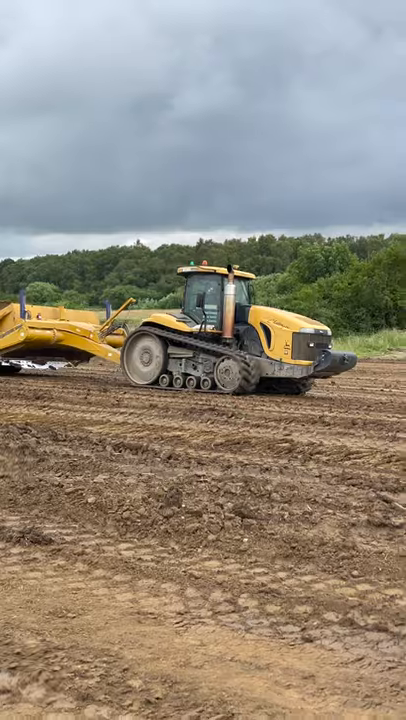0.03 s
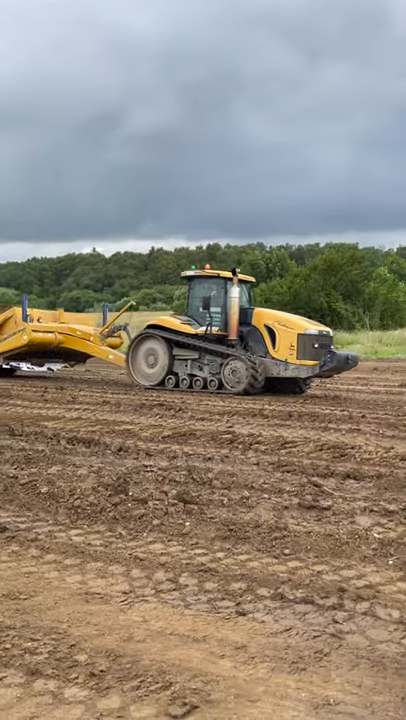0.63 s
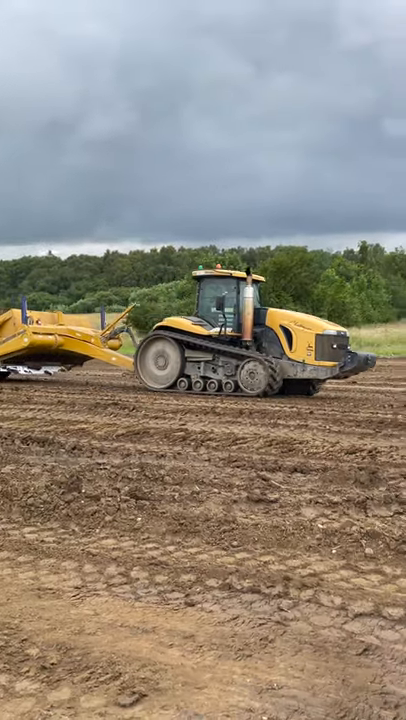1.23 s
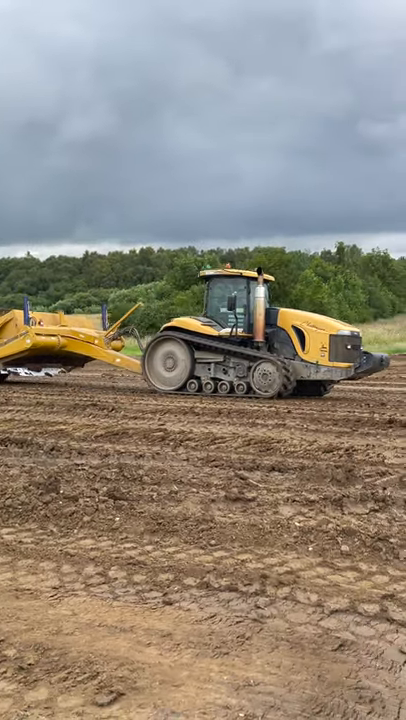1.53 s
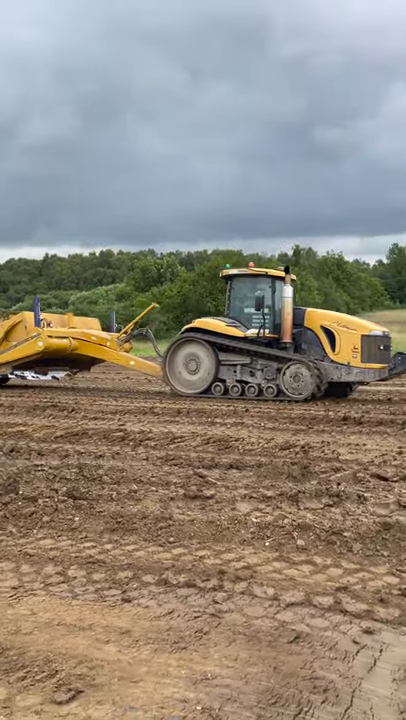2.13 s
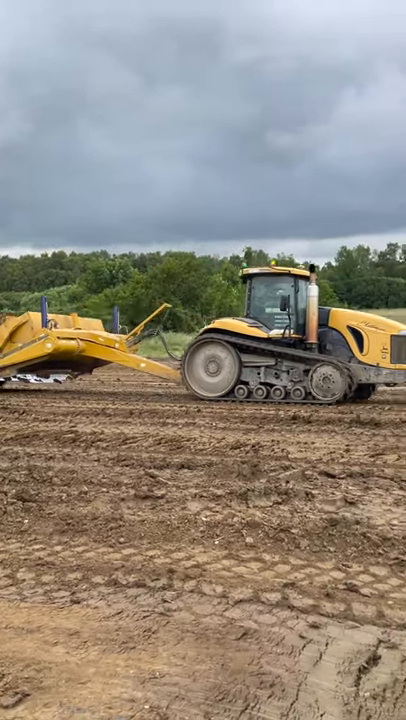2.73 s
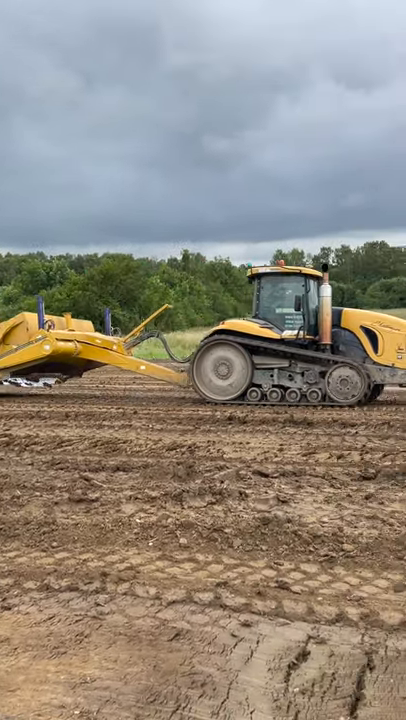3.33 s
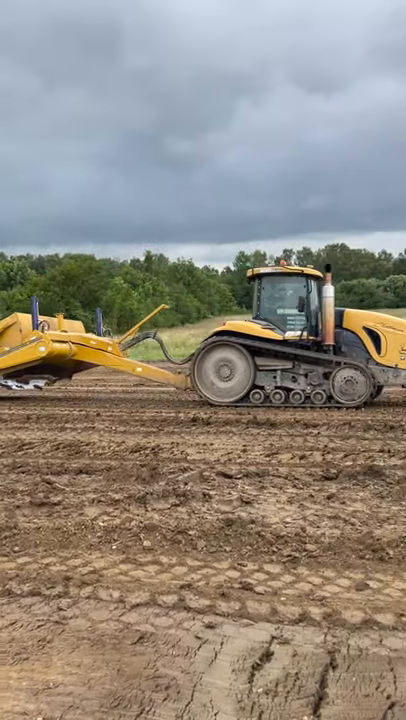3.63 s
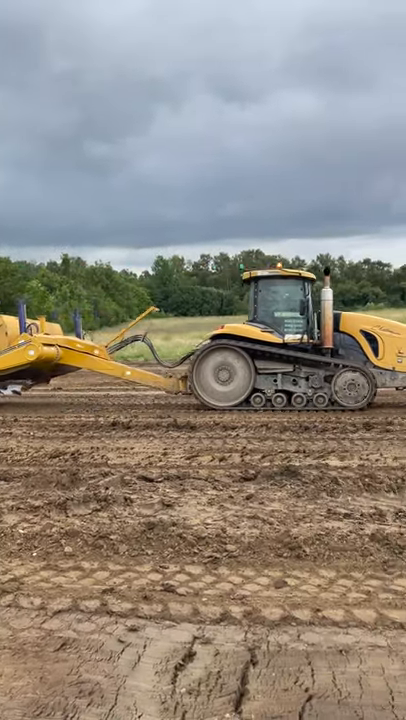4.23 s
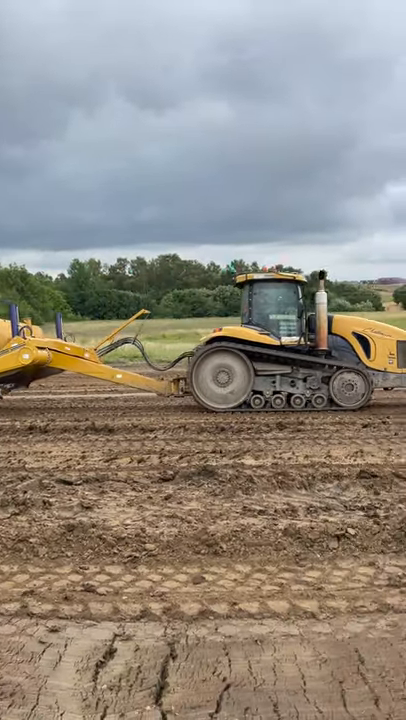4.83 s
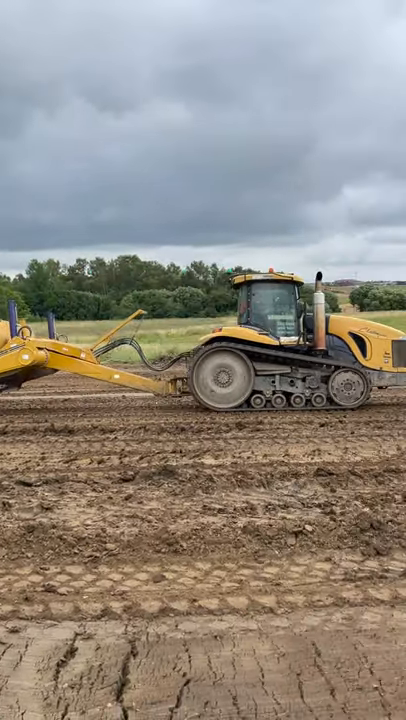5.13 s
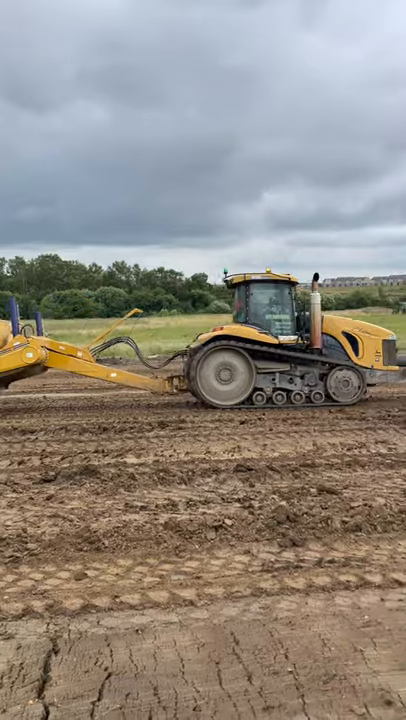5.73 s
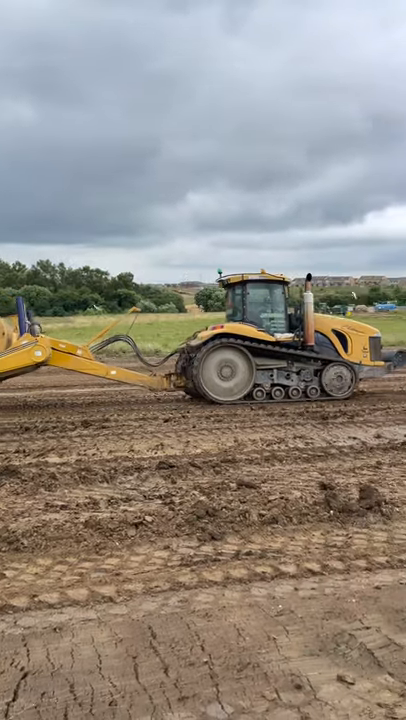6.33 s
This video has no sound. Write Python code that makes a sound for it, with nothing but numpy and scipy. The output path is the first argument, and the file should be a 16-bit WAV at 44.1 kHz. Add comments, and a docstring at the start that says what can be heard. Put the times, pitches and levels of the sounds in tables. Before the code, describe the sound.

Gusty wind thumps the microphone as a tractor passes with a steady diesel drone, rumbling tracks and short metallic squeals.

```python
"""An open dirt field, a two-port microphone in the wind, a rubber-tracked tractor hauling a scraper 15 m off.
Buffets hit first, over the unsteady exhaust drone of a six-cylinder diesel held at working speed.
The fan sings out as the grille faces us; near 3.6 s, in another gust, the clattering block draws level
and soil hisses in the scraper. The tracks rumble by, and the tractor moves on with its drone firm,
its gears whining and its running gear squealing."""
import sys
import numpy as np
from scipy import signal
from scipy.fft import rfft, irfft, next_fast_len
from scipy.io import wavfile
from scipy.ndimage import uniform_filter1d

SR = 44100
rng = np.random.default_rng(int(sys.argv[2]) if len(sys.argv) > 2 else 0)


def master(y):
    """Save y as 16-bit WAV."""
    cut = np.clip(np.atleast_2d(y).T, -1, 1)
    pcm = np.round(cut * 32767)  # scale
    wavfile.write(sys.argv[1], SR, pcm.astype(np.int16))


N = 289737
TIME = np.arange(N) / SR


def firing_note(cycle, boost_db=5.0, waver_db=0.3, octave_waver_db=1.0):
    """Six firings a cycle give the deep note and its octave; both waver in the moving air."""
    # Unsteady at first, firm as the tractor draws level. Each row: time in seconds, relative level in dB.
    note_levels = [(0.0, -21), (0.12, -34), (0.29, -20), (0.5, -35), (0.61, -22), (0.7, -28.5),
                   (1.08, -17.5), (1.18, -35), (1.38, -20.5), (1.44, -23), (1.51, -22), (1.72, -34),
                   (1.9, -19.5), (3.21, -17.5), (3.95, -16), (4.6, -18), (6.45, -18)]
    level, = in_time(note_levels)
    angle = 2 * np.pi * 6 * cycle
    note = from_db(level + boost_db + waver_db * drift(8)) * np.sin(angle)
    octave_db = passing(at_s=4.8, db=-19.3, directivity=5.2) + octave_waver_db * drift(3)
    return note + from_db(octave_db) * np.cos(2 * angle)


def exhaust(cycle, waver_db=2.5, jitter=0.0006, smear=0.035):
    """The firing note and the weaker lines of unequal cylinders; moving air makes those waver."""
    # Each row: multiple of the four-stroke cycle rate, relative level in dB.
    orders = [(7, -12), (9, -16.5), (10, -17), (14, -19), (22, -25), (24, -17), (27, -19.5), (28, -11),
              (30, -17), (31, -23), (34, -23), (36, -18), (42, -22), (43, -24), (45, -17.5), (51, -25),
              (55, -26), (63, -26), (69, -28)]
    cycle = cycle + jitter * drift(3.2)
    out = firing_note(cycle)
    level = passing(at_s=4.8, db=-16, directivity=2.1)
    for order, db in orders:
        line = np.sin(2 * np.pi * (order * cycle + rng.random() + smear * drift(3.6)))
        out = out + from_db(level + db + waver_db * drift(2.8)) * line
    return out


def knocking(cycle, repeat, size=2860):
    """Combustion and valve clatter: the share `repeat` recurs every cycle, the rest is new."""
    # Each entry: one cylinder's knock in dB, in firing order.
    cylinders = [1, 0.91, -0.68, -0.21, -0.86, -1.3]
    recurring = rng.standard_normal(size)[(cycle % 1 * size).astype(int)]
    strength_db = np.interp(cycle * 6 % 6, np.arange(6), cylinders, period=6)
    return (np.sqrt(repeat) * recurring + np.sqrt(1 - repeat) * white()) * from_db(strength_db)


def block(cycle, block_db, knock_db=2.0):
    """The engine block clatters with the knock of its cylinders."""
    # Each row: frequency in Hz, relative noise density in dB.
    colour = [(200, 11), (330, -4.5), (450, -2), (550, 2.5), (700, 5.5), (800, -3), (980, 1), (1150, -1),
              (1450, 0), (1580, -4), (1740, -7), (1830, -15.5), (2150, -12.5), (2500, -36), (4000, -31)]
    return from_db(block_db + knock_db + 0.5 * drift(6.1)) * coloured(knocking(cycle, repeat=0.2), colour)


def fan(speed, blades_per_firing=2.5765, waver_db=0.7, octave_db=-38, rush_db=-12):
    """The belt-driven fan: a blade note on a dull rush of air, and a faint octave that spreads all round."""
    # Strongest while the grille faces the microphone. Each row: time in seconds, level in dB.
    fan_levels = [(0, -33), (0.7, -33), (1.35, -18), (1.7, -20), (2.05, -15), (2.35, -14.5), (2.7, -15.2),
                  (3.15, -20.5), (3.85, -23), (4.15, -37), (4.7, -36), (5.4, -26), (6.2, -25), (6.57, -30)]
    # Air through the blades. Each row: frequency in Hz, relative noise density in dB.
    rush_colour = [(130, -2), (170, 1), (230, 0), (290, -0.5), (360, -3), (480, -3), (800, -28)]
    level, = in_time(fan_levels)
    angle = 2 * np.pi * turns(blades_per_firing * speed + 0.19 * drift(2.6))
    note = from_db(waver_db * drift(8.6)) * np.sin(angle)
    rush = from_db(rush_db) * coloured(white(), rush_colour)
    octave = from_db(octave_db + 1.4 * drift(0.92)) * np.sin(2 * angle)
    return from_db(level) * (note + rush) + octave


def tracks(lurch_db=1.5):
    """Rubber tracks rumble unevenly over the dirt."""
    # Each row: frequency in Hz, relative noise density in dB.
    colour = [(30, -36), (55, -8.5), (80, 1.5), (110, -0.5), (150, -4), (205, -1.5), (260, -10), (330, -20),
              (450, -9), (900, -22)]
    level = passing(at_s=4.13, db=-19, directivity=3.8) + lurch_db * drift(0.76)
    return from_db(level) * coloured(white(), colour)


def whines(speed, cycle, block_db, trim_db=-3.5, throb_db=1.5):
    """Gears and pumps whine in narrow bands that follow the engine speed and throb with its cycle."""
    # Each row: pitch in Hz, width in Hz, relative level in dB at the start and at the end.
    bands = [(1419, 36, -43, -4), (1673, 25, -14, -10.5), (1733, 17, -8, -16), (2956, 22, -15.5, -16.5)]
    level = block_db + trim_db + throb_db * np.cos(2 * np.pi * cycle)
    out = 0
    for hz, width_hz, early_db, late_db in bands:
        angle = 2 * np.pi * turns(hz * speed / np.mean(speed))
        tone = rms_one(drift(width_hz) * np.cos(angle) + drift(width_hz) * np.sin(angle))
        out = out + from_db(level + np.linspace(early_db, late_db, N)) * tone
    return out


def gear_mesh():
    """The main gear mesh sings up in clean swells."""
    # Each row: peak time in seconds, level in dB, half length in seconds, pitch in Hz.
    swells = [(0.98, -40, 0.17, 1992), (1.3, -41, 0.06, 1992), (1.61, -36, 0.06, 1992),
              (1.8, -33, 0.1, 1994), (2.1, -33, 0.12, 1995), (2.52, -39, 0.09, 1993),
              (3.25, -32.5, 0.3, 1982), (3.82, -37, 0.09, 1990), (4.22, -39, 0.13, 1988),
              (4.58, -38, 0.06, 1985), (5.08, -33, 0.25, 1981), (5.68, -41, 0.19, 1977)]
    return singing(swells, wobble_hz=2.5)


def squeals():
    """The running gear squeals at an unsteady pitch."""
    # Each row: peak time in seconds, level in dB, half length in seconds, pitch in Hz.
    swells = [(0.09, -46, 0.066, 1740), (0.57, -31, 0.037, 1690), (0.66, -35, 0.04, 2780),
              (0.82, -32, 0.04, 1720), (1.25, -33, 0.06, 1680), (1.6, -35, 0.04, 2750),
              (1.88, -31, 0.1, 1680), (2.1, -33, 0.03, 3300), (2.34, -31, 0.04, 1742),
              (2.52, -30, 0.046, 1735), (2.56, -38, 0.06, 3100), (2.72, -31, 0.19, 1440),
              (2.79, -30, 0.04, 1690), (2.81, -37, 0.05, 3290), (3.08, -41, 0.16, 1459),
              (3.46, -30.5, 0.031, 3110), (3.47, -38, 0.04, 3240), (4.22, -32, 0.06, 1395),
              (4.42, -31, 0.03, 1725), (4.47, -39, 0.11, 2740), (4.82, -38, 0.04, 3290),
              (5.45, -40, 0.14, 3335), (5.73, -30.5, 0.03, 1723), (4.52, -26, 0.053, 1395),
              (4.7, -31, 0.06, 1412), (4.85, -27, 0.04, 1688), (4.92, -29.5, 0.18, 1485),
              (5.05, -29, 0.085, 1440), (5.17, -32, 0.08, 1400), (5.95, -27.5, 0.15, 1430),
              (6.47, -32, 0.17, 1420)]
    return singing(swells, wobble_hz=8)


def singing(swells, wobble_hz):
    """Metal that sings up and fades: one wavering tone for each swell."""
    wobble = wobble_hz * drift(12)
    return sum(from_db(db) * bump(s, half) * np.sin(2 * np.pi * (turns(hz + wobble) + rng.random()))
               for s, db, half, hz in swells)


def hiss(cycle, intake_db, soil_db, rush_db=-2.0, slide_db=-4.5, crumble_db=1.0):
    """Air rushes through the engine and soil slides unevenly into the scraper; both pulse with the engine."""
    # Each row of both: frequency in Hz, relative noise density in dB.
    intake_colour = [(1500, 5), (2100, 5), (2400, 0.5), (2900, 1), (3300, 0.5), (3650, -5), (4300, -6),
                     (5000, -35), (8000, -39)]
    soil_colour = [(2500, 3), (3600, 0.5), (4300, 1.5), (5000, 2), (5700, -2), (6500, -3), (7700, -3),
                   (8300, 6.5), (8800, 8.5), (9500, -3), (10200, 4), (11000, -4), (12000, -11.5),
                   (13000, -19)]
    pulse = from_db(0.8 * np.cos(2 * np.pi * 6 * cycle) - 0.4 * np.cos(2 * np.pi * cycle))
    intake = from_db(intake_db + rush_db) * coloured(knocking(cycle, repeat=0.17), intake_colour)
    soil = from_db(soil_db + slide_db + crumble_db * drift(31)) * coloured(white(), soil_colour)
    return intake + pulse * soil


def rattle(level_db, trim_db=-10.0, per_s=160, size_db=1.5, t60_s=0.04, wander_db=2.0):
    """Loose steel in the running gear clinks at random; each ring comes and goes as the parts shift."""
    # Each row: ring frequency in Hz, relative strength of the blows in dB.
    steel_modes = [(2570, -3), (2735, -1), (2860, -3), (3105, 0), (3235, -1), (3292, 0), (3342, -1),
                   (4080, -3), (4370, -2)]
    clinks = (rng.random(N) < per_s / SR) * from_db(size_db * np.minimum(rng.exponential(1, N), 4))
    decay = from_db(-60 / (t60_s * SR))
    out = 0
    for hz, db in steel_modes:
        blows = clinks * white() * from_db(db + wander_db * np.minimum(drift(2.5), 1.5))
        resonance = [1, -2 * decay * np.cos(2 * np.pi * hz / SR), decay * decay]
        out = out + signal.lfilter([1], resonance, blows + 1e-18)
    return from_db(level_db + trim_db) * rms_one(out)


def hiss_swells():
    """The high hiss swells briefly and brightens."""
    # Each row: peak time in seconds, level in dB, half length in seconds.
    swells = [(3.65, -40.5, 0.67), (4.45, -39, 0.099), (4.65, -42, 0.29)]
    # Each row: frequency in Hz, relative noise density in dB.
    colour = [(2500, -21), (4200, 21), (5000, 9), (7000, 17), (8500, 9), (11000, -58)]
    return sum(from_db(db) * bump(s, half) for s, db, half in swells) * coloured(white(), colour)


def wind(breeze_rumble_db=-31, breeze_eddies_db=-29.5, lumpy_db=4.0, own=0.51, rumble_side=0.088):
    """Wind on the microphone: deep rumble in both ports, lumpy eddies partly their own; gusts raise both."""
    # Each row of both: frequency in Hz, relative noise density in dB.
    rumble_colour = [(15, -26), (28, -23), (40, -11.5), (55, -2.5), (70, -2), (100, -16.5), (200, -13),
                     (500, -49)]
    eddy_colour = [(50, -11), (120, 2.5), (200, 6.5), (300, 0), (450, -1), (700, -6), (1100, -11.5),
                   (2000, -73)]
    # Each row: peak time in seconds, rumble in dB, eddies in dB, half length in seconds.
    gusts = [(0.1, -34, -32, 0.2), (1.425, -26, -26, 0.072), (1.565, -37, -35, 0.054),
             (2.4, -44, -32, 0.33), (3.655, -22, -35, 0.17), (4.098, -26.5, -34, 0.29)]
    rumble = coloured(white(), rumble_colour) + rumble_side * apart(coloured(white(), rumble_colour))
    shared, left, right = [
        rms_one(coloured(white(), eddy_colour) * from_db(lumpy_db * np.minimum(drift(28), 2)))
        for _ in range(3)]
    eddies = rms_one(shared + own * np.array([left, right]))
    out = from_db(breeze_rumble_db) * rumble + from_db(breeze_eddies_db) * eddies
    for s, rumble_db, eddies_db, half in gusts:
        out = out + bump(s, half) * (from_db(rumble_db) * rumble + from_db(eddies_db) * eddies)
    return out


def buffets(trim_db=-0.3, own=0.15, thump=1.2, sudden_s=0.009, fall_ratio=0.49, size=8000):
    """Single eddies hit the ports: a dull puff builds and breaks off, the quick ones with a push of air."""
    # Each row: peak time in seconds, relative level in dB, rise time in seconds, upper edge in Hz.
    puffs = [(0.02, -17, 0.012, 400), (0.092, -19, 0.018, 520), (0.133, -9.5, 0.008, 440),
             (0.195, -25, 0.015, 650), (0.223, -17, 0.007, 330), (0.26, -15.5, 0.016, 320),
             (0.292, -13, 0.012, 430), (0.404, -15.5, 0.013, 420), (0.443, -13.5, 0.016, 660),
             (0.49, -20, 0.016, 900), (0.511, -10, 0.0055, 800), (0.576, -19, 0.008, 320),
             (0.79, -22, 0.015, 320), (1.152, -14.5, 0.011, 320), (1.215, -16, 0.01, 340),
             (1.273, -18, 0.012, 460), (1.305, -13, 0.013, 360), (1.366, -12.5, 0.021, 380),
             (1.395, -6.5, 0.005, 380), (1.403, -17.5, 0.024, 820), (1.413, -7.5, 0.013, 260),
             (1.42, -13, 0.005, 520), (1.44, -21, 0.016, 750), (1.466, -18, 0.006, 1400),
             (1.51, -17.5, 0.028, 680), (1.553, -18, 0.009, 380), (1.643, -16, 0.009, 360),
             (1.7, -16, 0.008, 620), (3.086, -9, 0.003, 900), (3.096, -14, 0.004, 450),
             (3.201, -18.5, 0.016, 600), (3.551, -12, 0.006, 480), (3.63, -11.5, 0.009, 470),
             (3.722, -14, 0.008, 640), (3.765, -15, 0.007, 330)]
    out, peak = np.zeros((2, N + SR)), size // 2
    age = (np.arange(size) - peak) / SR
    for s, db, rise, top_hz in puffs:
        noise = rng.standard_normal((3, size))
        swell = np.exp(-(age / np.where(age < 0, rise, rise * fall_ratio)) ** 2)
        air = (noise[0] + own * noise[1:]) * swell
        push = thump * min(1, sudden_s / rise) ** 2  # slow eddies only flutter
        air[:, peak] -= push * np.sqrt(np.sum(swell ** 2))
        band = signal.butter(4, [top_hz / 6, top_hz], "band", fs=SR, output="sos")
        puff = rms_one(signal.sosfilt(band, air)) * np.sqrt(np.mean(swell ** 2))
        start = round(s * SR)
        out[:, start:start + size] += from_db(db + trim_db) * puff
    return out[:, peak:peak + N]


def ports(sound, resting_width=0.045):
    """The right port hears a later, weaker copy; at times its midrange turns opposite to the left."""
    # Each row: frequency in Hz, right against left in dB, right's phase lag in radians.
    right_port = [(60, -1.1, 0), (130, -2, .2), (230, -6.2, .25), (310, -3.5, .6), (450, -7.5, 1.1),
                  (560, -10, 2.7), (700, -9, 3.8), (860, -1.5, 4.4), (1000, -5.2, 4.8), (1400, -3, 5.85),
                  (1620, 0, 6.28), (3700, 0, 6.28), (4480, 0, 7.1), (5400, 0, 12.35), (6400, 0, 12.65),
                  (8400, 0, 15.2), (10200, 0, 16.4), (11700, 0, 18.85)]
    # The midrange swings wide. Each row: peak time in seconds, share from 0 to 1, half length in seconds.
    widenings = [(4.17, 0.52, 0.15), (5.03, 0.36, 0.06), (5.5, 0.1, 0.25), (6.55, 0.4, 0.13)]
    # The band that swings. Each row: frequency in Hz, gain in dB.
    wide_band = [(100, -40), (135, -32), (250, 11), (950, 2.5), (1350, -23), (1700, -57)]
    response = np.array(right_port)
    right = shaped(sound, response[:, :2], lag=response[:, 2])
    width = resting_width + sum(share * bump(s, half) for s, share, half in widenings)
    return np.array([sound, right - width * shaped(sound + right, wide_band)])


def narrowed(pair, from_s=4.33, to_s=5.36):
    """For about a second the lower hiss moves from the sides to the centre."""
    # Each row: frequency in Hz, gain in dB.
    hiss_band = [(3000, -60), (3600, 0), (6300, 0), (7200, -60)]
    share = uniform_filter1d(((TIME > from_s) & (TIME < to_s)) * 1.0, size=2000)
    side = share * shaped((pair[0] - pair[1]) / 2, hiss_band)
    return pair - apart(side) + side


def hollowed(pair):
    """The midrange sinks for a moment and comes back."""
    # Each row: time in seconds, depth in dB, half length in seconds.
    dips = [(4.18, -4, 0.14), (5.05, -1.5, 0.05), (5.44, -2.5, 0.06)]
    # The band that sinks. Each row: frequency in Hz, weight in dB.
    dip_band = [(220, -40), (300, -6), (450, -30), (560, 0), (780, -1), (1150, -25)]
    sink_db = sum(db * bump(s, half) for s, db, half in dips)
    return pair - (1 - from_db(sink_db)) * shaped(pair, dip_band)


def passing(at_s, db, directivity, distance_m=15.0, m_per_s=3.0):
    """Level in dB of a part that faces the microphone at `at_s`; directivity above 1 narrows its beam."""
    range_m = np.hypot(distance_m, m_per_s * (TIME - at_s))
    return db - directivity * 20 * np.log10(range_m / distance_m)


def from_db(db):
    """Decibels to gain."""
    return 10 ** (np.asarray(db) / 20)


def rms_one(x):
    """Scale to unit power."""
    return x / np.sqrt(np.mean(x ** 2) + 1e-20)


def in_time(rows):
    """Each column of a curve at every sample."""
    s, *columns = np.transpose(rows)
    return [np.interp(TIME, s, c) for c in columns]


def shaped(x, points, lag=None):
    """Filter by a (Hz, dB) curve, with a phase lag at each point if given."""
    hz, db = np.transpose(points)
    size = next_fast_len(N)
    log_hz = np.log(np.maximum(np.arange(size // 2 + 1) * SR / size, 1))
    gain = from_db(np.interp(log_hz, np.log(hz), db))
    if lag is not None:
        gain = gain * np.exp(-1j * np.interp(log_hz, np.log(hz), lag))
    return irfft(rfft(x, size) * gain, size)[..., :N]


def coloured(x, spectrum):
    """Give a sound a spectrum with closed ends; rms 1."""
    closed = [(spectrum[0][0] / 2, -80), *spectrum, (spectrum[-1][0] * 2, -90)]
    return rms_one(shaped(x, closed))


def white():
    """One channel of white noise."""
    return rng.standard_normal(N)


def drift(hz, step=40):
    """A random wander, mostly slower than `hz`, with spread 1."""
    pole = np.exp(-2 * np.pi * hz * step / SR)
    slow = signal.lfilter([1], [1, -2 * pole, pole * pole], rng.standard_normal(N // step + 2002))[2000:]
    return np.interp(np.arange(N) / step, np.arange(len(slow)), rms_one(slow))


def turns(hz):
    """Revolutions made so far at a changing rate."""
    return np.cumsum(hz) / SR


def apart(side):
    """A signal that is opposite in the two channels."""
    return np.array([side, -side])


def bump(s, half):
    """A smooth rise and fall of height 1."""
    return np.exp(-((TIME - s) / half) ** 2)


def scene(intake_waver_db=1.0, soil_waver_db=0.94):
    """The tractor drives past the microphone with a little diffuse sound around it, in the wind."""
    # Each row: time in seconds, firings per second.
    engine_speed = [(0, 92.9), (2.3, 92.85), (3.1, 92.55), (5.0, 92.55), (5.5, 92.2), (6.57, 92.35)]
    # Diffuse share of the machine noise. Each row: frequency in Hz, side against direct in dB.
    spread = [(50, -9), (120, -9.5), (220, -7.5), (330, 0.5), (500, -46), (1000, -15), (1400, -25),
              (1800, -71), (3400, -62), (4600, -5), (6000, -15), (8800, -4), (11000, -4), (12000, -35)]
    speed, = in_time(engine_speed)
    cycle = turns(speed / 6)  # four-stroke cycles so far
    block_db = passing(at_s=3.64, db=-23, directivity=2.08)
    treble_dip_db = -2.2 * bump(1.27, 0.22)  # as the strongest gust builds
    intake_db = passing(at_s=2.45, db=-29, directivity=1.8) + treble_dip_db + intake_waver_db * drift(4)
    soil_db = passing(at_s=3.6, db=-27.5, directivity=1.36) + soil_waver_db * drift(4)
    metal = whines(speed, cycle, block_db) + gear_mesh() + squeals() + rattle(intake_db)
    drone = exhaust(cycle) + fan(speed)
    direct, diffuse = [block(cycle, block_db) + tracks() + hiss(cycle, intake_db, soil_db)
                       for _ in range(2)]
    tractor = ports(drone + metal + direct) + apart(shaped(diffuse, spread))
    return hollowed(narrowed(tractor) + wind()) + hiss_swells() + buffets()


def record(dry, stopband_hz=14256):
    """The recorder holds down the highest peaks and cuts the top."""
    held = dry / (1 + np.abs(dry) ** 8) ** (1 / 8)
    return signal.sosfilt(signal.cheby2(12, 70, stopband_hz, fs=SR, output="sos"), held)


dry = scene()
out = record(dry)
master(out)
```